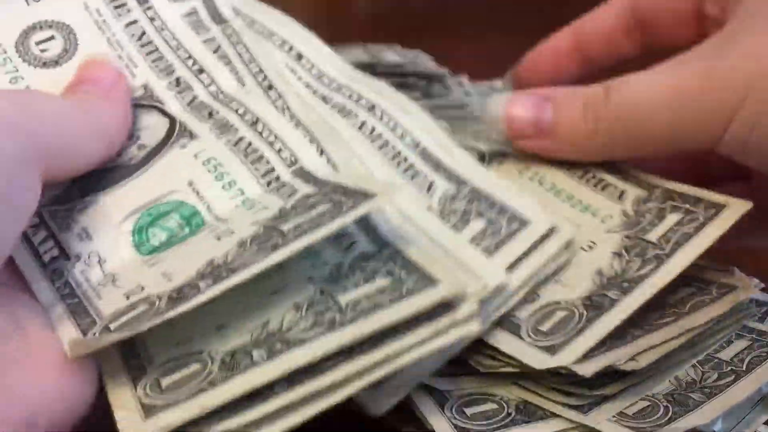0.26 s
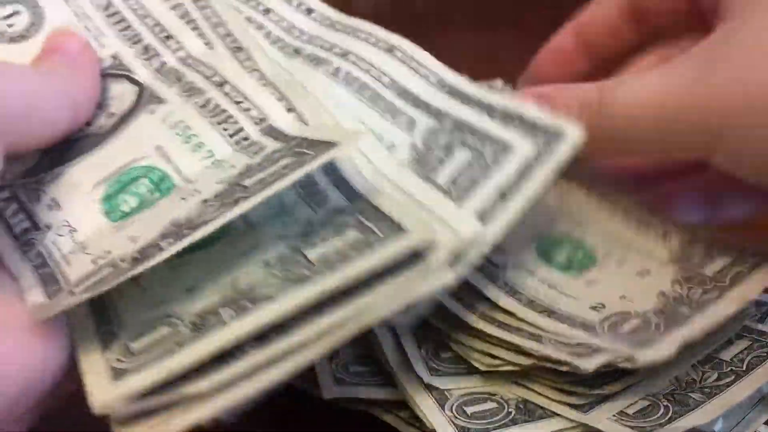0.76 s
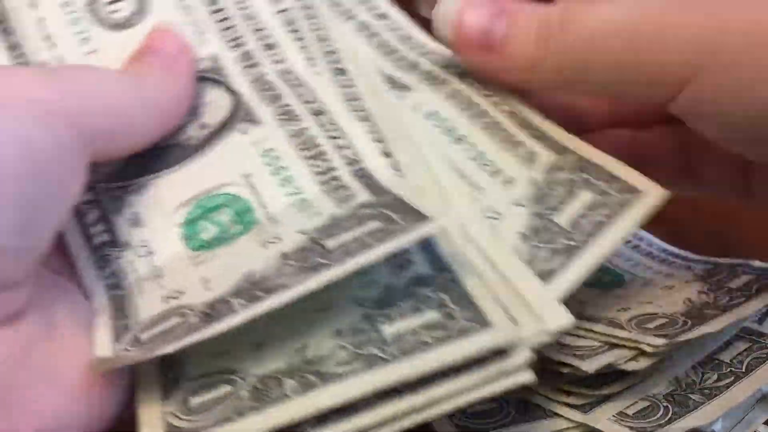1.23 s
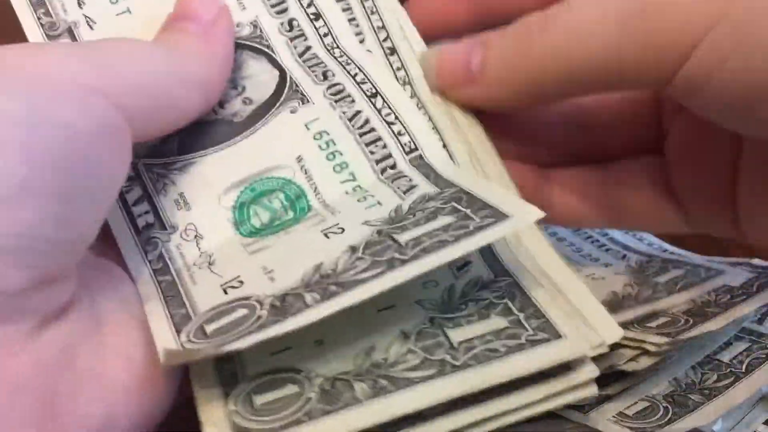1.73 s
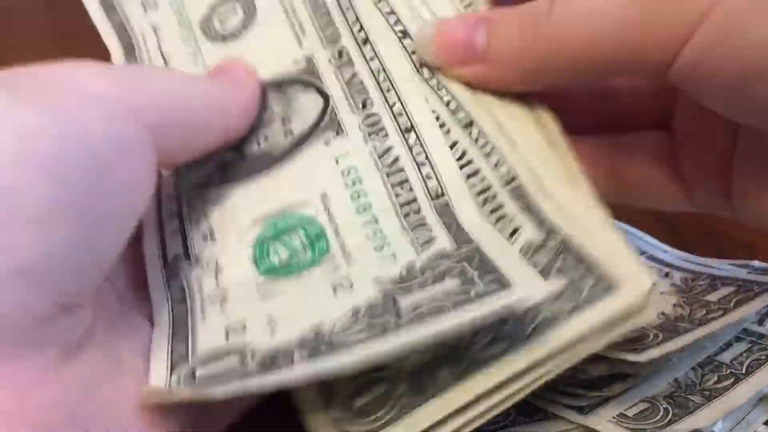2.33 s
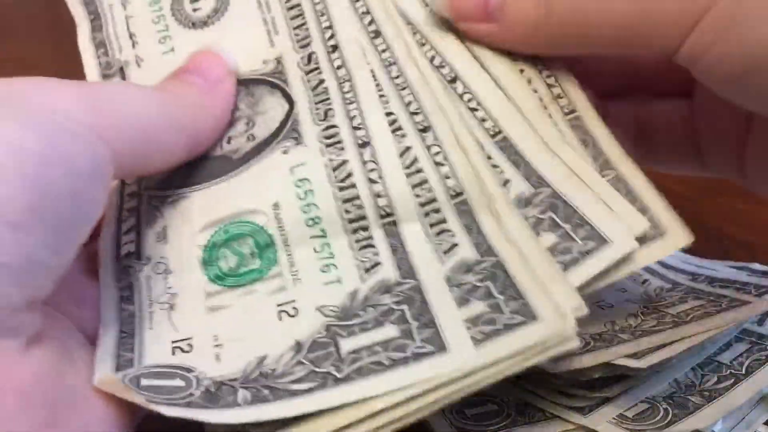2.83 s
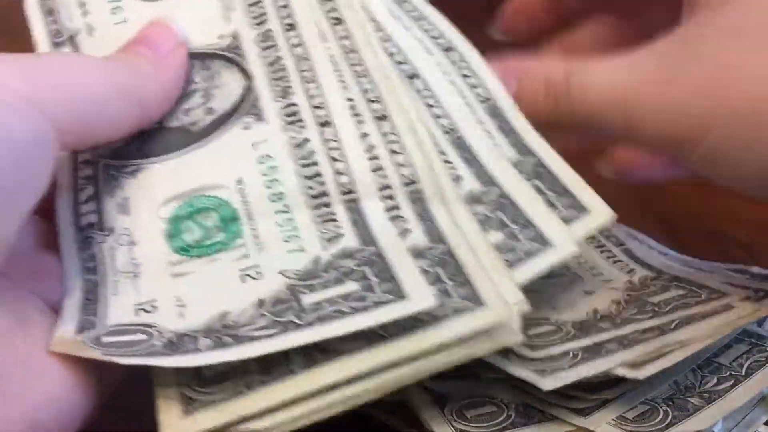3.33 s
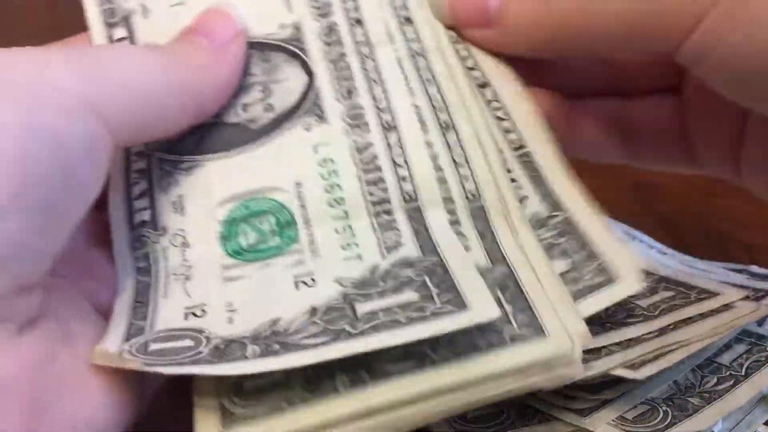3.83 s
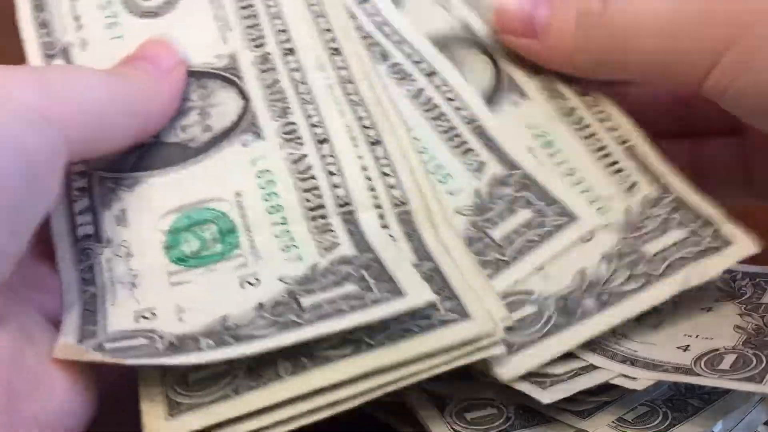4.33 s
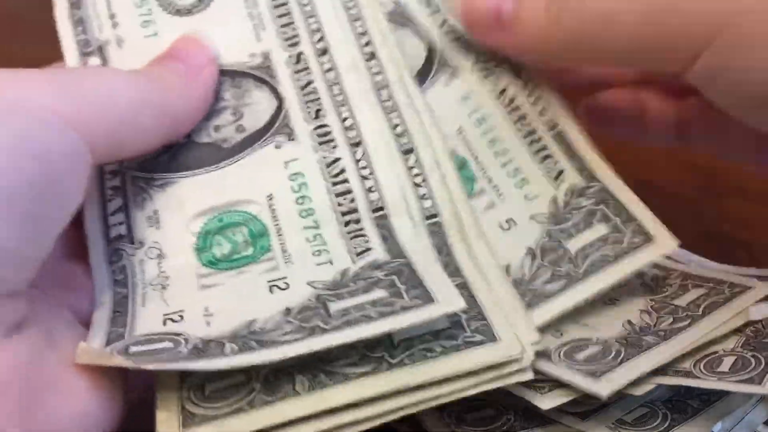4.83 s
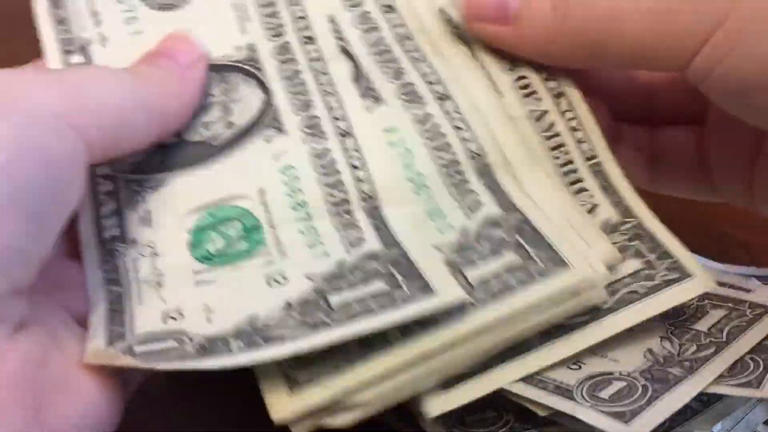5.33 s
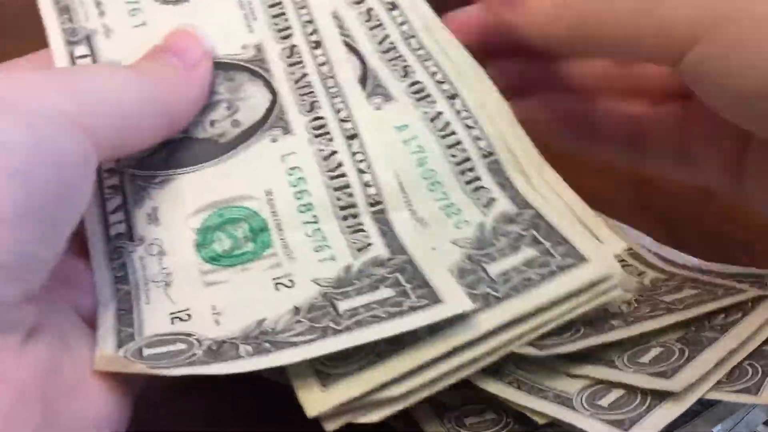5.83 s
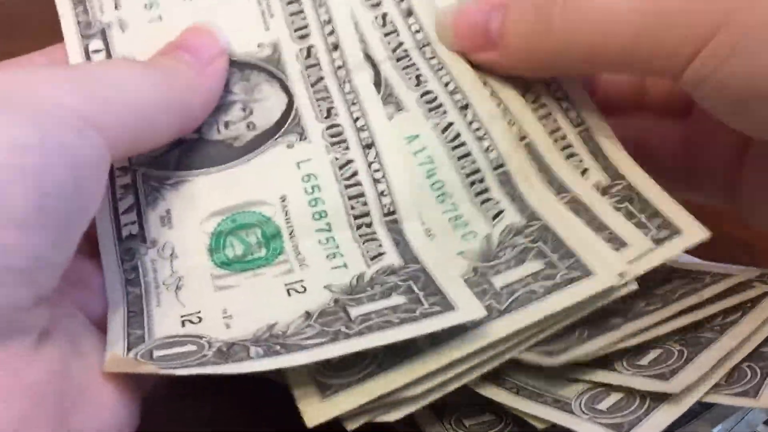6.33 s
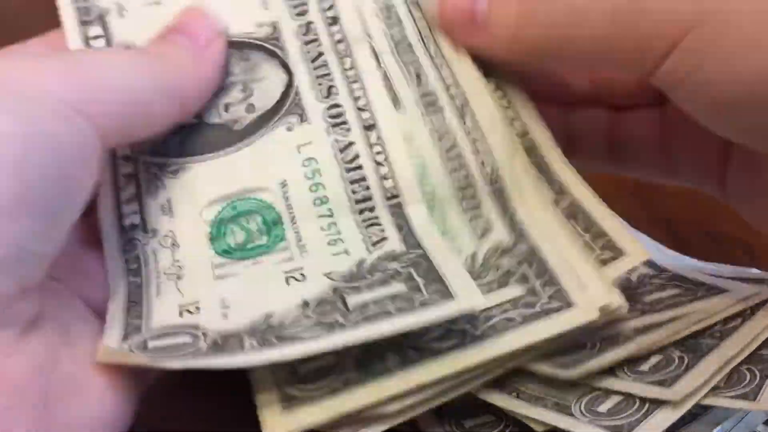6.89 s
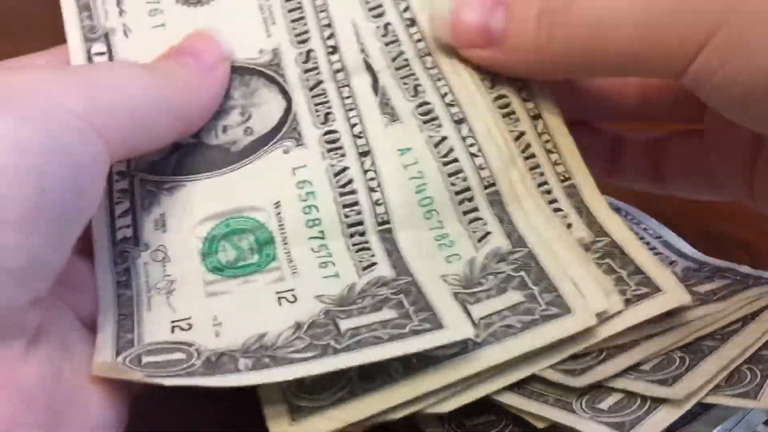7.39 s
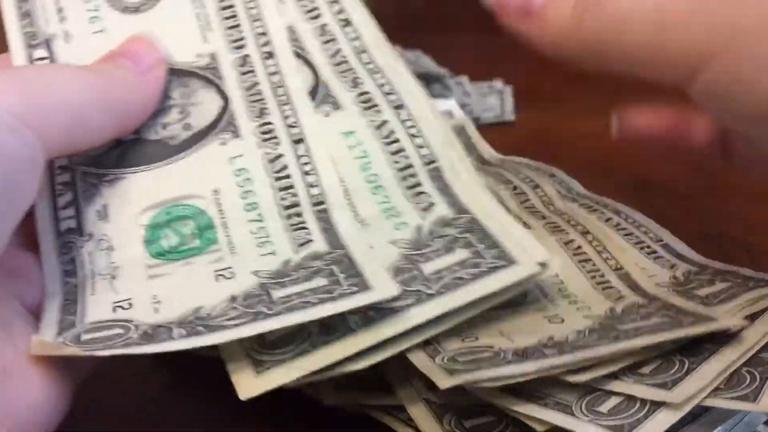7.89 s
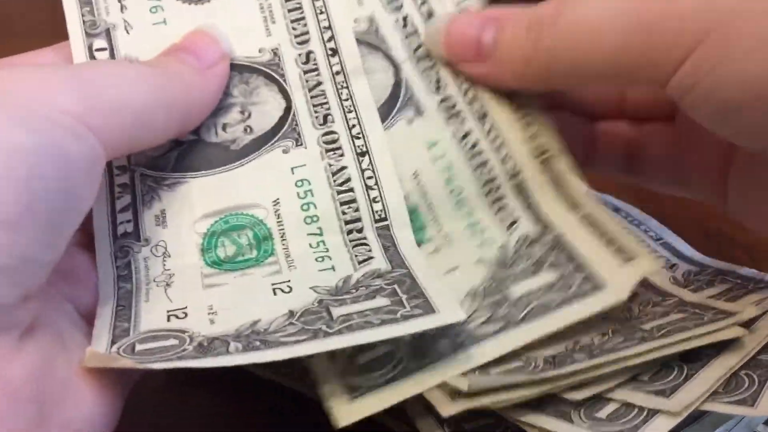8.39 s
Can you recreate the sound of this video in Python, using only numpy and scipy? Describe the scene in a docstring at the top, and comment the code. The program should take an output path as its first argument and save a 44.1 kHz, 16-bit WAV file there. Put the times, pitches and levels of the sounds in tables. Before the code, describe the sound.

Dry, grainy swishes and papery edge flicks as a wad of bills is thumbed through unevenly, one note cracking taut midway, over faint room hum.

```python
"""Banknotes are counted by hand, close to the microphone, in a small quiet room with a faint machine hum.
Notes slide in strokes of grainy friction noise, comb-filtered by the gaps between sheets; creases pop as
tiny noise bursts, edges flick as bursts through the paper's colour, and sheets flap as short sinking swings.
One note snaps taut with a crack and a modal ring; curled notes hoot at gliding pitches.
Short echoes and narrow rings surround it all, over steady filtered air noise."""
import sys
import numpy as np
from scipy import signal
from scipy.fft import rfft, irfft
from scipy.io import wavfile

SR = 44100
rng = np.random.default_rng(int(sys.argv[2]) if len(sys.argv) > 2 else 0)


def to_wav(sig):
    """Store sig (one row per channel, or 1-D mono) as 16-bit WAV at the path in sys.argv[1].

    Samples outside -1..1 are clipped; the rate is SR.
    """
    pcm = np.clip(np.atleast_2d(sig), -1, 1) * 32767
    pcm = np.round(pcm).astype(np.int16)
    wavfile.write(sys.argv[1], SR, pcm.T)  # frames by channels


N = 381509
TIME = np.arange(N) / SR
# ranges in which a sheet radiates: low and high edge in Hz
MID_HZ, TREBLE_HZ, BODY_HZ = (1400, 6000), (6000, 17000), (550, 1400)


def from_db(db):
    """Amplitude factor of a level in dB."""
    return 10 ** (np.asarray(db) / 20)


def rms_one(x):
    """Scales x to rms 1."""
    return x / np.sqrt(np.mean(x ** 2) + 1e-20)


def unit_energy(x):
    """Scales x to energy 1."""
    return x / np.linalg.norm(x)


def drift(rate_hz):
    """Random wander, rms 1: straight lines between random knots, rate_hz knots a second."""
    knots = rng.standard_normal(N // 8)
    return rms_one(np.interp(TIME * rate_hz, np.arange(len(knots)), knots))


def response(spectrum, band_hz=None, size=2048):
    """Minimum-phase impulse response of unit energy with the given spectrum, optionally band-limited."""
    hz, db = np.transpose(spectrum)
    grid_hz = np.maximum(np.arange(size // 2 + 1) * SR / size, 1)
    grid_db = np.interp(np.log(grid_hz), np.log(hz), db)
    cepstrum = irfft(np.log(from_db(grid_db)))
    # folding the cepstrum onto positive time makes the response causal
    pulse = irfft(np.exp(rfft(2 * cepstrum[:size // 2], size)))
    if band_hz is not None:
        pulse = signal.sosfilt(signal.butter(3, band_hz, "band", fs=SR, output="sos"), pulse)
    return unit_energy(pulse)


def through(x, pulse):
    """Filters x by an impulse response, cut to N samples."""
    return signal.oaconvolve(x, pulse)[:N]


def add(track, start_s, sound):
    """Mixes a short sound into the track at start_s."""
    start = int(np.clip(round(start_s * SR), 0, N))
    track[start:start + len(sound)] += sound[:N - start]


def grains(per_s, spread_db, hiss_share):
    """Fibres catch and let go: clicks of uneven size over a finer hiss; rms about 1."""
    size_db = spread_db * np.minimum(rng.exponential(1, N), 4)
    sizes = from_db(size_db) * rng.choice([-1, 1], N)
    clicks = rms_one(sizes * (rng.random(N) < per_s / SR))
    return np.sqrt(1 - hiss_share) * clicks + np.sqrt(hiss_share) * rng.standard_normal(N)


def burst(decay_s, size=512):
    """A quick run of tiny slips: exponentially decaying noise of unit energy."""
    return unit_energy(rng.standard_normal(size) * np.exp(-np.arange(size) / SR / decay_s))


# Colour of the room's steady air. Each row: frequency in Hz, relative density in dB per Hz.
AIR_SPECTRUM = [(15, -65), (25, -33.5), (89, -4.5), (263, -6), (427, -6), (463, -6.5), (641, -9),
                (840, -14.5), (1190, -16.5), (1700, -23), (3520, -27), (3920, -25.5), (5140, -24.5),
                (7110, -26.5), (16000, -35)]


def room_air(level_db=-67.12):
    """Soft room air: white noise through the air's colour."""
    return from_db(level_db) * through(rng.standard_normal(N), response(AIR_SPECTRUM, size=8192))


# Machine hum. Each row: frequency in Hz, rms level in dB before wavering.
HUM_TONES = [(116, -80.5), (238, -79.5), (290, -80.5), (481, -75), (3843, -89.5)]


def machine_hum(waver=0.5, wander_rad=1.5):
    """Sines whose levels waver and whose phases wander at random."""
    out = np.zeros(N)
    for hz, db in HUM_TONES:
        level = from_db(db) * np.sqrt(2) * (1 + waver * drift(11))
        wander = wander_rad * (drift(22) + 2 * drift(3.2))
        out += level * np.sin(2 * np.pi * hz * TIME + wander)
    return out


# Colour of rubbed paper. Each row: frequency in Hz, relative density in dB per Hz.
PAPER_SPECTRUM = [(200, -15), (600, -16.5), (850, -11), (1000, -14.5), (1300, -5.5), (2100, -2), (2850, 0),
                  (3600, -5.5), (6000, -3), (7300, -9.5), (8000, -5.5), (9600, -7), (11000, -4),
                  (13500, -2.5), (16000, -12)]


def fidgeting(level_db=-75.0, spread_db=5.0, rate_hz=70):
    """The held fan of notes keeps up a faint, uneven rustle of friction grains throughout."""
    grip = from_db(spread_db * np.clip(drift(rate_hz), -3, 1.8))
    rustle = grip * grains(per_s=1000, spread_db=-0.5, hiss_share=0.43)
    return from_db(level_db) * through(rustle, response(PAPER_SPECTRUM, (700, 15000)))


# Notes drawn out of the fan, gathering speed until free.
# Each row: start in seconds, length in seconds, final mid-band level in dB before trims,
# treble in dB relative to mid before trims.
PULLS = [(0.201, 0.046, -51.5, -4.5), (0.983, 0.16, -48, -4), (1.345, 0.065, -43.5, -4),
         (1.948, 0.11, -50.5, -4), (3.187, 0.088, -53.5, 0.5), (3.606, 0.052, -46.5, -1),
         (3.947, 0.086, -50, 1), (4.927, 0.029, -39, -8), (5.649, 0.11, -57.5, 7), (5.995, 0.1, -50, 3),
         (6.323, 0.065, -50.5, 5.5), (7.013, 0.1, -46.5, -2.5), (7.407, 0.12, -57.5, 2)]
# The thumb rubs notes over each other at an even pace.
# Each row: start in seconds, length in seconds, mid-band level in dB before trims,
# treble in dB relative to mid before trims.
RUBS = [(0.117, 0.034, -62.5, 2.5), (0.572, 0.057, -57.5, 1), (0.648, 0.072, -58, 4),
        (0.926, 0.016, -52.5, -7), (1.429, 0.049, -61, 6.5), (1.88, 0.036, -61, 3), (2.13, 0.014, -54, 5.5),
        (2.323, 0.075, -64, 12), (2.42, 0.074, -63.5, 4), (2.515, 0.037, -67.5, 4),
        (2.804, 0.052, -65.5, 4.5), (2.901, 0.06, -61, -1), (3.154, 0.0086, -60, 3), (3.434, 0.04, -47, -5),
        (4.054, 0.034, -57, 10.5), (4.253, 0.015, -64.5, 3), (4.322, 0.066, -50.5, -0.5),
        (4.595, 0.13, -53, 0.5), (4.776, 0.032, -64, 3), (4.966, 0.036, -62, 2), (5.219, 0.099, -66.5, 8.5),
        (5.372, 0.058, -64.5, 6.5), (5.935, 0.0089, -63.5, 5), (6.099, 0.039, -61.5, 9.5),
        (6.426, 0.011, -64, 10), (6.47, 0.017, -64.5, 11), (6.547, 0.039, -56, 3), (6.626, 0.012, -47, 4),
        (6.709, 0.0043, -47.5, 7), (6.75, 0.14, -59, 5.5), (6.959, 0.021, -62, 6), (7.129, 0.032, -73, 14),
        (7.303, 0.0072, -64, 5), (7.358, 0.017, -63, 8), (7.745, 0.058, -59.5, 6.5),
        (7.845, 0.029, -63.5, 3.5), (8.085, 0.05, -57, 3.5), (8.167, 0.028, -60.5, 6),
        (8.232, 0.025, -68, 0), (8.404, 0.012, -58.5, 3), (8.45, 0.023, -54.5, 6), (8.529, 0.029, -56, 6.5)]
ATTACK_S, RELEASE_S = 0.0099, 0.011   # time per 10 dB of rise and fall
PULL_SWELL_DB, PULL_CURVE = 9.5, 1.63   # most of a pull's growth comes late
RUB_ARCH_DB = 3   # a rub is this much softer at its ends
TREBLE_SWELL_SHARE = 0.73   # treble swells less, so a pull gets fuller as it speeds up
SETTLE_BELOW_DB, SETTLE_S = 20.5, 0.06   # settling: this much softer, time per 10 dB of fall


def stroke_levels(t):
    """Mid and treble dB of every stroke: attack, swelling (pull) or arched (rub) hold, release, settling."""
    start, length, level, treble = np.transpose(PULLS + RUBS)[:, :, None]
    done = np.clip((t - start) / length, 0, 1)
    is_pull = np.arange(len(start))[:, None] < len(PULLS)
    pull_db = PULL_SWELL_DB * (1 - done ** PULL_CURVE)
    rub_db = RUB_ARCH_DB * (2 * done - 1) ** 2
    hold_db = np.where(is_pull, pull_db, rub_db)
    before, after = np.maximum(start - t, 0), np.maximum(t - start - length, 0)
    fall_db = np.minimum(10 * after / RELEASE_S, SETTLE_BELOW_DB + 10 * after / SETTLE_S)
    edges_db = 10 * before / ATTACK_S + fall_db
    return level - hold_db - edges_db, level + treble - TREBLE_SWELL_SHARE * hold_db - edges_db


def sliding(judder_db=1.9, judder_hz=260, colour_db=1.5, colour_hz=60, treble_db=-5.0, sheen_db=-1.5,
            body_db=-61.5, body_follows=0.76, firm_db=-49.5, flutter_db=-8.0):
    """Dry friction: grains swell and fade with each stroke as the note judders over its neighbour."""
    coarse = TIME[::32]
    mid, treble = stroke_levels(coarse)
    # the body has body_db in a firm stroke and follows part of the stroke's swing
    body = body_db + body_follows * (mid - firm_db)
    judder = judder_db * drift(judder_hz)
    # the treble's halves waver apart; the bending sheet flutters below its body range
    ranges = [(MID_HZ, mid), ((6000, 10500), treble + treble_db), ((10500, 17000), treble + sheen_db),
              (BODY_HZ, body), ((170, 550), body + flutter_db)]
    out = np.zeros(N)
    for band_hz, db in ranges:
        # strokes add in power
        speed = np.interp(TIME, coarse, np.linalg.norm(from_db(db), axis=0))
        grip = rms_one(from_db(judder + colour_db * drift(colour_hz)))
        friction = speed * grip * grains(per_s=3500, spread_db=4.5, hiss_share=0.33)
        out += through(friction, response(PAPER_SPECTRUM, band_hz))
    return out


def between_sheets(x, echo=0.42, gap_s=.00062, sway=.4, sway_hz=14):
    """Sound bounces between the notes; as the gap opens and closes, its comb resonances shift."""
    for gap in gap_s, gap_s * np.e:
        lag_s = gap * np.exp(sway * drift(sway_hz))
        source = np.clip(np.arange(N) - np.round(lag_s * SR).astype(int), 0, N - 1)
        x = (x - echo * x[source]) / np.hypot(1, echo)
    return x


def crinkles(count=5, level_db=7.5, spread_db=3.0, scatter=0.45, decay_s=.0007):
    """Every stroke bends the note and pops small creases: band-passed bursts, louder in a stronger stroke."""
    out = np.zeros(N)
    for start, length, stroke_db, _ in PULLS + RUBS:
        for when, size, pitch in rng.standard_normal((count, 3)):
            hz = 4200 * 2 ** np.clip(pitch, -1.5, 1.2)
            band = signal.butter(1, [hz / 2, hz * 2], "band", fs=SR, output="sos")
            tick = unit_energy(signal.sosfilt(band, burst(decay_s)))
            # creases far from the middle of the stroke pop louder
            db = stroke_db + level_db + spread_db * (when ** 2 - size)
            add(out, start + length / 2 * (1 + scatter * when), from_db(db) * tick)
    return out


# Edges springing free, each with a flap after it. Each row: time in seconds, mid-band level in dB,
# treble level in dB, flap level in dB (levels before trims), flap frequency in Hz.
FLICKS = [(0.2251, -32, -42.5, -75, 466), (0.2593, -34.5, -66, -52, 250), (0.9464, -41.5, -63, -47.5, 252),
          (1.1296, -31.5, -57, -74, 479), (1.159, -34.5, -45.5, -47.5, 308), (1.3059, -34.5, -55, -61, 242),
          (1.3974, -25.5, -56, -70, 415), (1.4348, -27, -35.5, -56.5, 293),
          (1.7823, -37.5, -38.5, -73, 180), (1.8502, -50, -52.5, -65, 466), (1.9998, -30, -51, -51, 366),
          (2.055, -30, -63, -48, 316), (2.4169, -33, -55, -54.5, 315), (3.1608, -42, -49, -61.5, 244),
          (3.2927, -57, -40, -57, 315), (3.416, -38, -54, -70, 310), (3.5392, -46, -57, -63, 468),
          (3.7082, -41.5, -44.5, -62, 400), (3.8437, -51, -65, -63, 457), (3.9973, -31, -43, -64, 463),
          (4.0338, -65, -36.5, -58, 173), (4.4655, -48.5, -61, -69, 250), (4.568, -42, -56.5, -63, 250),
          (4.7163, -67, -39.5, -60, 342), (4.779, -41.5, -42.5, -80, 460), (4.8957, -32.5, -52, -58, 474),
          (4.9022, -26.5, -44, -51.5, 243), (5.1634, -57, -55, -78, 199), (5.7564, -36, -54, -61.5, 172),
          (6.2706, -55, -50, -59, 172), (6.4018, -30.5, -51, -56.5, 302), (6.553, -55, -36.5, -66, 479),
          (6.5977, -31.5, -37, -48, 220), (6.6306, -31.5, -32.5, -70, 476), (6.7071, -37.5, -32, -43, 336),
          (6.7832, -30.5, -38, -70, 377), (6.8146, -35, -48, -60, 312), (6.8473, -35, -61, -72, 301),
          (6.8796, -37.5, -50, -62, 238), (7.5994, -44.5, -48, -70, 366), (7.7125, -47, -48, -51, 256),
          (8.0505, -46.5, -48.5, -51, 380), (8.395, -39, -45, -48.5, 227), (8.4743, -39.5, -56, -54, 272),
          (8.5155, -44, -53, -60, 250)]


def flicking(decay_s=0.0012, mid_db=9.0, treble_db=17.0, body_db=19.0, scrape_db=-4.0,
             lead_s=.003, trail_s=0.0076, size=900):
    """An edge scrapes over its neighbour and springs free: one burst excites all ranges of the sheet."""
    out, t = np.zeros(N), np.arange(-size, size) / SR
    ranges = [response(PAPER_SPECTRUM, band_hz) for band_hz in (MID_HZ, TREBLE_HZ, BODY_HZ)]
    for s, mid, treble, flap, _ in FLICKS:
        scrape_shape = np.exp(-np.abs(t) / np.where(t < 0, lead_s, trail_s))
        scrape = unit_energy(rng.standard_normal(len(t)) * scrape_shape)
        release = np.pad(burst(decay_s, size=size), (size, 0))
        slips = release + from_db(scrape_db) * scrape
        # the body's level lies halfway between mid band and flap, plus its trim
        levels_db = (mid + mid_db, treble + treble_db, (mid + flap) / 2 + body_db)
        for pulse, db in zip(ranges, levels_db):
            add(out, s + t[0], from_db(db) * unit_energy(signal.fftconvolve(slips, pulse)))
    return out


# A loose note or the wad drops slack.
# Each row: time in seconds, level in dB before trim, swing frequency in Hz.
DROPS = [(1.459, -42.5, 153), (3.445, -35.5, 340), (3.679, -47.5, 200), (4.198, -47, 170),
         (4.906, -37.5, 257), (5.918, -51, 218), (6.97, -46.5, 215), (7.3, -51, 237), (7.74, -38.5, 175),
         (8.072, -36.5, 203)]


def flapping(flick_cycles=0.61, drop_cycles=0.67, sag=0.27, ragged=0.26, flick_db=6.0, drop_db=-3.0,
             thud_db=-14.0, thud_hz=135, thud_s=0.0052, size=4000):
    """The sheet swings and pushes air, slowing as it goes slack; the wad in the hand answers with a thud."""
    out, t = np.zeros(N), np.arange(size) / SR
    dull = signal.butter(2, [150, 650], "band", fs=SR, output="sos")
    swings = [(s, flap + flick_db, hz, flick_cycles) for s, _, _, flap, hz in FLICKS]
    swings += [(s, db + drop_db, hz, drop_cycles) for s, db, hz in DROPS]
    for s, db, hz, cycles in swings:
        age = t * hz / cycles   # 1 at the envelope's peak
        swing_hz = hz * (1 + sag * (np.exp(1 - age) - 1) / 2)
        swing = np.sin(2 * np.pi * np.cumsum(swing_hz) / SR)
        wobble = rms_one(signal.sosfilt(dull, rng.standard_normal(size)))
        flap = age * np.exp(1 - age) * (swing + ragged * wobble)
        wad_hz = thud_hz * np.exp(0.16 * rng.standard_normal())
        thud_shape = t / thud_s * np.exp(1 - t / thud_s)
        thud = thud_shape * np.sin(2 * np.pi * (wad_hz * t + rng.random()))
        add(out, s, from_db(db) * (flap + from_db(thud_db) * thud))
    return out


# The taut note's crack and rebound. Each row: time in seconds, level in dB before trim.
SNAPS = [(3.4488, 6), (3.4493, -15)]
# Ring of the taut sheet. Each row: frequency in Hz, level in dB, 60 dB decay time in seconds.
SNAP_MODES = [(1300, -18.5, 0.0056), (2130, -14, 0.011), (2800, -40, 0.0056), (3805, -17, 0.0062),
              (4500, -30.5, 0.0037), (5240, -25.5, 0.014), (6650, -30, 0.019), (7620, -19, 0.0071),
              (10850, -13, 0.0035), (11400, -11, 0.0039), (13840, -23, .006)]
# Colour of the crack. Each row: frequency in Hz, relative density in dB per Hz.
CRACK_SPECTRUM = [(40, -42.5), (200, -69), (800, -2), (1200, -3), (2100, 4), (3200, 10), (4700, 10),
                  (6000, -3), (8000, 7), (9500, -14), (11200, 16), (13500, -3.5), (16000, -7.5)]


def snapping(crack_db=-6.5, decay_s=0.0011, low_hz=1150, size=3000):
    """A note is pulled taut: a hard jolt with slips behind it, a rebound, and a brief ring without bass."""
    out, t = np.zeros(N), np.arange(size) / SR
    for s, db in SNAPS:
        slips = burst(decay_s)
        slips[0] = 1
        crack = unit_energy(signal.fftconvolve(slips, response(CRACK_SPECTRUM)))
        add(out, s, from_db(db + crack_db) * crack)
    ring = np.zeros(size)
    for k, (hz, db, t60_s) in enumerate(SNAP_MODES):
        ring += (-1) ** k * from_db(db - 60 * t / t60_s) * np.sin(2 * np.pi * hz * t)
    no_bass = signal.butter(4, low_hz, "high", fs=SR, output="sos")
    add(out, SNAPS[0][0], signal.sosfilt(no_bass, ring))
    # three all-passes: bending waves carry treble across the sheet faster than lows
    return signal.sosfilt([[-.55, 1, 0, 1, -.55, 0]] * 3, out)


# A curled note sounds one hollow pitch as it is dragged over an edge.
# Each row: centre time in seconds, peak level in dB before trim, centre frequency in Hz,
# time from peak to 1/e in seconds.
CURLS = [(4.647, -49, 1610, 0.0075), (4.691, -50, 840, 0.0034), (6.087, -47, 780, 0.0039),
         (6.792, -50, 325.5, 0.012), (6.817, -47, 890, 0.004), (7.522, -47, 1454, 0.0032),
         (7.601, -48.5, 1470, 0.0024), (8.519, -43.5, 740, 0.0025)]


def hooting(level_db=1.0, width_hz=150, glide=.16, size=4096):
    """Friction feeds a narrow resonance of the pocket under a curled note; pitch falls as the pocket opens."""
    out, t = np.zeros(N), (np.arange(size) - size // 2) / SR
    for s, db, hz, length in CURLS:
        knots = rng.standard_normal(size // 8)
        wander_rad = np.interp((t - t[0]) * width_hz * 2, np.arange(len(knots)), knots)
        pitch_hz = hz * np.exp(-glide * np.clip(t / length, -2, 2))
        phase = 2 * np.pi * np.cumsum(pitch_hz) / SR
        swell = from_db(db + level_db) * np.exp(-(t / length) ** 2)
        add(out, s + t[0], swell * np.sin(phase + wander_rad))
    return out


# Hard things nearby ring along. Each row: frequency in Hz, bandwidth in Hz, gain at resonance in dB.
SYMPATHY = [(376, 28, 1.5), (478, 31.3, 5), (2000, 230, -6), (3520, 20, -9), (4220, 20, -3),
            (4240, 15, -15), (4620, 34, 0), (7980, 60, 0.5), (10690, 61, -15.5)]


def room(x, near_db=-18.0, near_t60_s=0.066, far_db=-51.0, far_t60_s=0.19, wall_hz=6000, size=16000):
    """Quick scatter from table and hands, a weak dull tail from the walls, and narrow rings."""
    t, echoes = np.arange(size) / SR, np.zeros(size)
    absorb = signal.butter(2, wall_hz, fs=SR, output="sos")
    for db, t60_s in (near_db, near_t60_s), (far_db, far_t60_s):
        scatter = rng.standard_normal(size) * from_db(-60 * t / t60_s) * (t > .003)
        echoes += from_db(db) * unit_energy(signal.sosfilt(absorb, scatter))
    for hz, width_hz, db in SYMPATHY:
        ring = np.exp(-np.pi * width_hz * t) * np.cos(2 * np.pi * hz * t)
        echoes += from_db(db) * 2 * np.pi * width_hz / SR * ring
    return x + through(x, echoes)


def scene():
    """The notes sound in the room, over its air and hum."""
    strokes = between_sheets(sliding()) + crinkles() + fidgeting()
    notes = strokes + flicking() + flapping() + snapping() + hooting()
    return (room(notes) + room_air() + machine_hum())[None]


def record(dry, bass_cut_hz=72, top_cut_hz=15900):
    """The microphone sheds the deep bass; the top is cut steeply."""
    thin = signal.sosfilt(signal.butter(2, bass_cut_hz, "high", fs=SR, output="sos"), dry)
    return signal.sosfilt(signal.ellip(10, .1, 70, top_cut_hz, fs=SR, output="sos"), thin)


dry = scene()
out = record(dry)
to_wav(out)
```